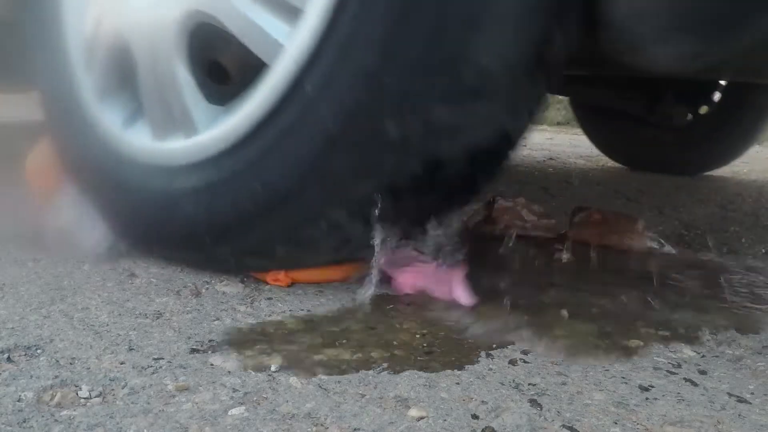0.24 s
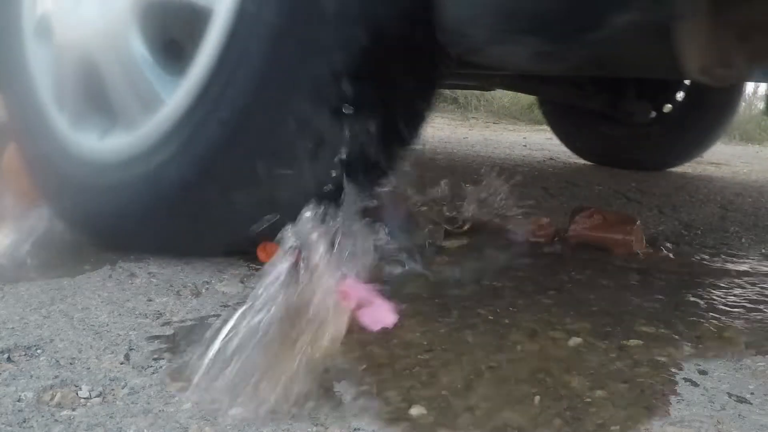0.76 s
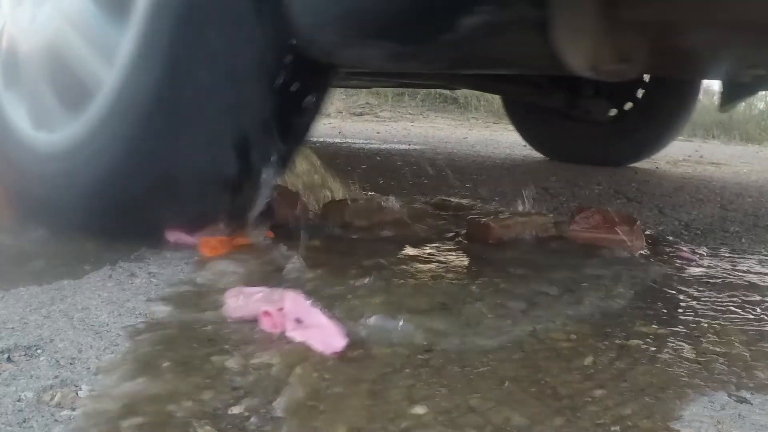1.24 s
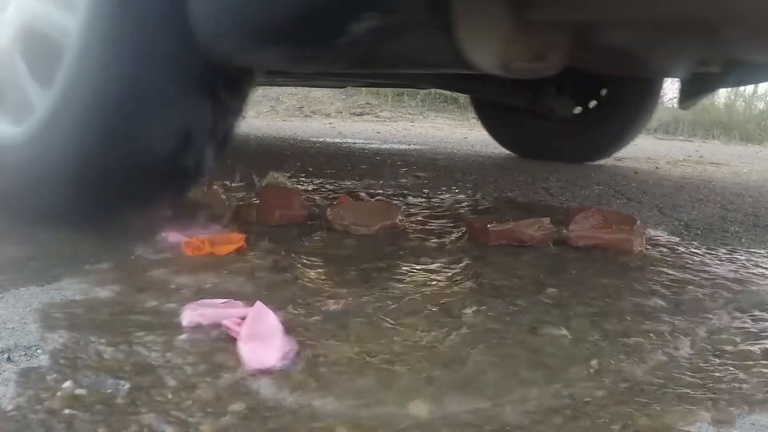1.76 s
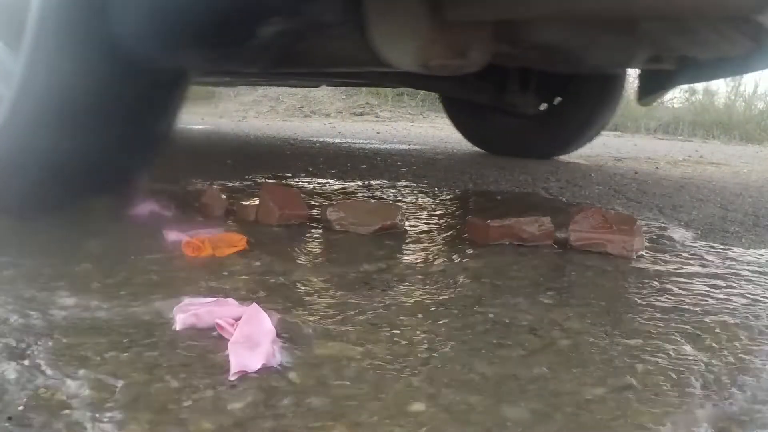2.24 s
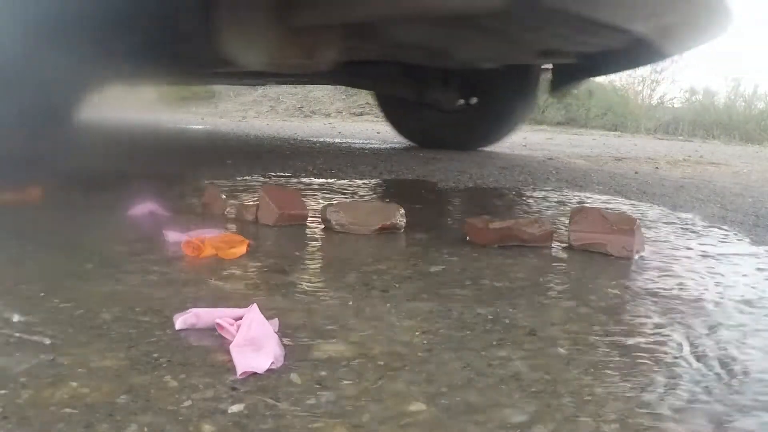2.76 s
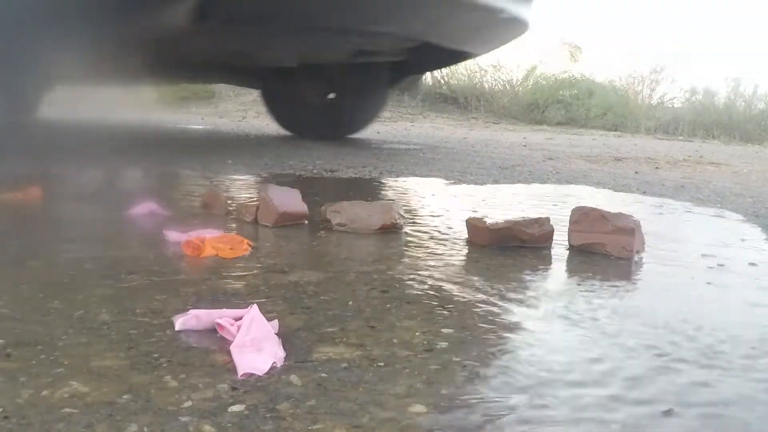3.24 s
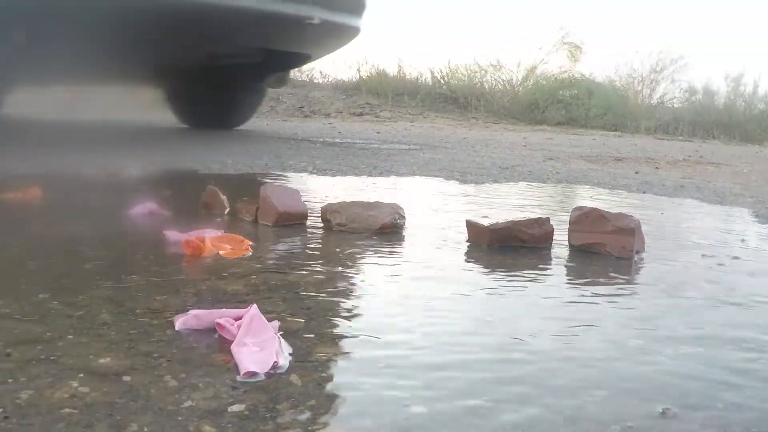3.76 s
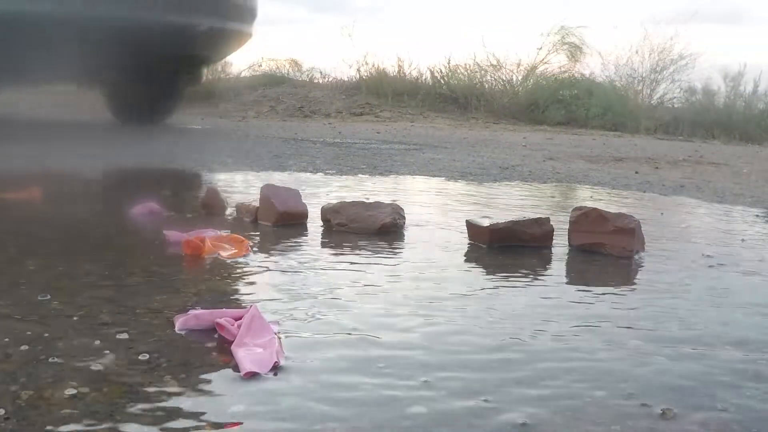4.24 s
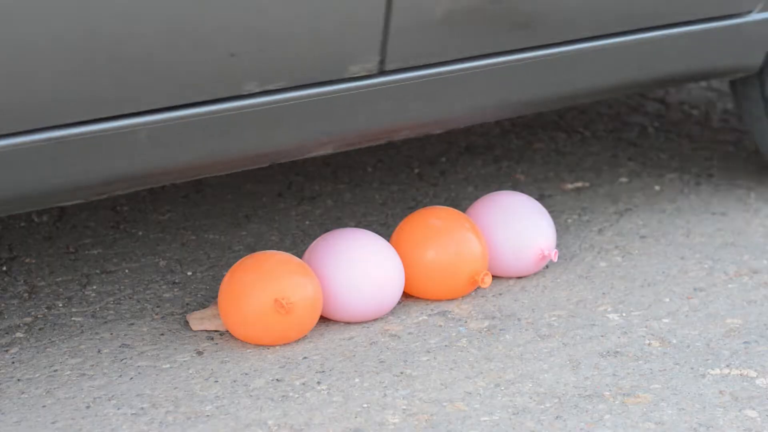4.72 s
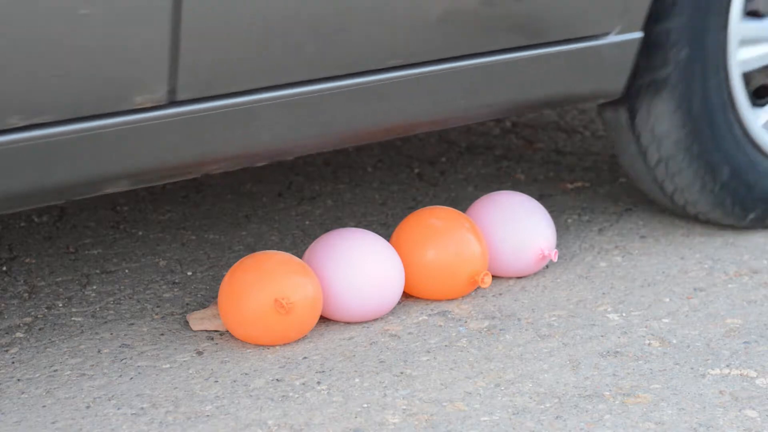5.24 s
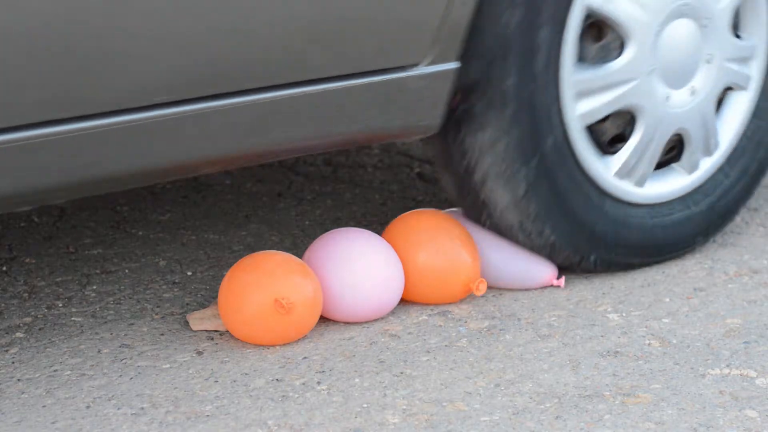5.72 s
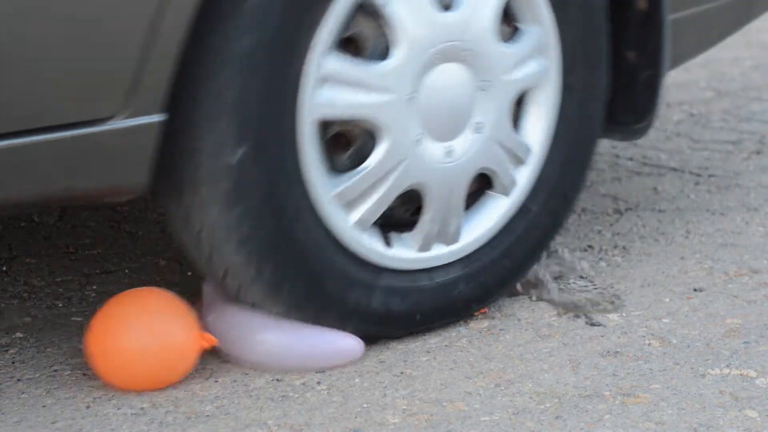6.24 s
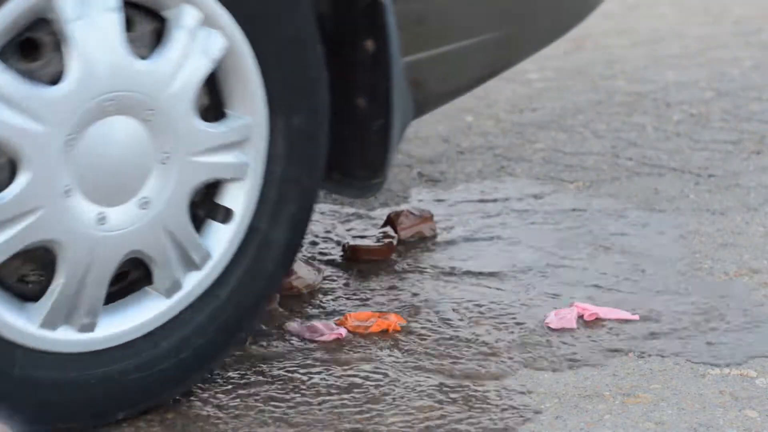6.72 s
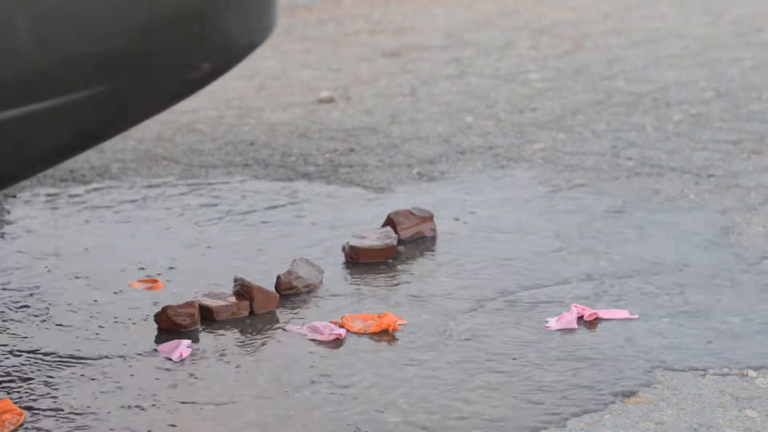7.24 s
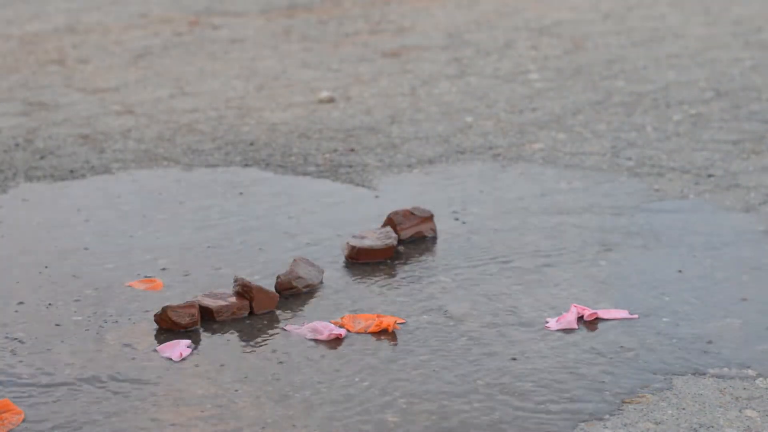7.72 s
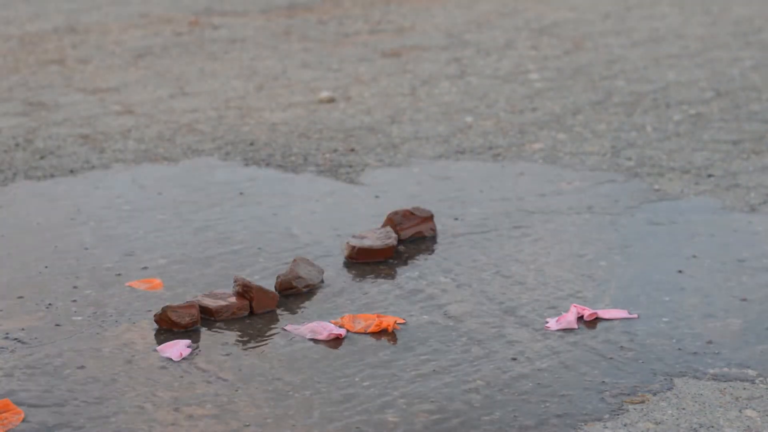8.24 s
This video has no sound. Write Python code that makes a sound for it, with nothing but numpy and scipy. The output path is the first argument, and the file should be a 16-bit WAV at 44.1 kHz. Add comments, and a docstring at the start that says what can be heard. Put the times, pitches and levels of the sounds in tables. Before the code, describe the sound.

Outdoors on a gritty road, slowed and muffled balloon bursts ring under a car as water gushes and gurgles over a low rumble. One loud bang follows, then a quiet stretch of wet tyres rolling away. Suddenly the car is near the microphone, its engine idling with a clatter in a little wind. Water balloons squeak and pop brightly under the tyre, water spatters, and the engine slows.

```python
"""Water balloons burst under the tyre of a creeping car, in three scenes joined by sudden cuts.
First, slowed down and dull: each burst rings the hollow under the car, water sloshes and drips,
and one last bang overloads the sound. Next the car rolls faintly away, cracking small stones.
Last, close up: tight rubber snaps and squeaks and the tyre sprays water, while the engine's
firings make it drone, clatter and hiss and a little wind blows."""
import sys
import numpy as np
from scipy import signal
from scipy.fft import rfft, irfft
from scipy.io import wavfile
from scipy.ndimage import uniform_filter1d

SR = 44100
rng = np.random.default_rng(int(sys.argv[2]) if len(sys.argv) > 2 else 0)


def log_audio(samples):
    """Write samples as a 16-bit WAV file to the path given in sys.argv[1]."""
    # one column per channel
    frames = np.atleast_2d(samples).T
    # limit to full scale, then quantise
    limited = np.clip(frames, -1, 1)
    pcm = np.round(limited * 32767).astype(np.int16)
    wavfile.write(sys.argv[1], SR, pcm)


N = 373527
T = np.arange(N) / SR
CUT_AWAY_S, CUT_CLOSE_S, LEAVES_S = 2.6, 4.5585, 5.9  # two cuts; then the close car starts to leave

# Levels in tables are relative. t60 is the time to fade by 60 dB; a swell's width is half its length.
# gusts of wind: t/s, width/s, level/dB
GUSTS = [(5.288, 0.14, -28), (6.5, 0.21, -32), (6.692, 0.034, -26.5), (8.3, .35, -39)]
# tone of the wind: f/Hz, level/dB
WIND_TONE = [(20, -28), (45, -6.5), (90, -3), (190, -9.5), (400, -14.5), (1200, -72)]

# hum of the far engine: multiple of the firing rate, level/dB
FAR_HUM = [(1, 1), (2, -9.5), (4, -11), (5, -9), (9, -6.5), (10, -13)]
# tone of the far car's rumble and of its tyres: f/Hz, level/dB
FAR_RUMBLE_TONE = [(12, -23), (25, -2), (40, 6.5), (60, -11), (130, -15.5), (300, -24), (400, -17),
                   (520, -29.5), (1000, -41.5)]
FAR_ROAD_TONE = [(300, -7), (700, -11), (1400, -4.5), (1800, -7.5), (2100, -13), (2400, -2.5), (3400, -0.5),
                 (4300, -13), (4900, -10), (5800, -14), (7000, -14), (7800, -29), (10500, -29),
                 (15000, -37)]
# ringing of the far tyres, and a thin whine: f/Hz, width/Hz, level/dB
FAR_ROAD_RINGS = [(1780, 130, 0), (3280, 100, -3.5), (4850, 69, 5)]
FAR_WHINE = [(8500, 200, 0)]
# stones cracking under the far tyres: t/s, level/dB
STONES = [(2.675, -38), (2.7046, -32), (2.7644, -40), (3.5097, -47), (3.5893, -45), (3.8838, -44),
          (3.914, -47.5)]

# engine firings per second, steady and then sagging: t/s, f/Hz
FIRING_RATE = [(4.56, 42.46), (4.65, 42.02), (5.21, 41.5), (5.93, 42.59), (7.49, 41.72), (7.83, 41.2),
               (8.1, 34.03), (8.4, 31.6), (8.47, 32.36)]
# hum of the close exhaust: multiple of the firing rate, level/dB
EXHAUST_HUM = [(1, -2), (2, 5), (2.5, -6), (3, -4), (3.5, -11.5), (4, 3), (5.5, -1), (6, -7), (6.5, -10.5),
               (7, -5.5)]
# engine tones that stand out in turn: multiple of the firing rate, start/s, end/s, level/dB
PASSING_TONES = [(3, 4.56, 5.76, -37), (10, 3.5, 5.95, -32), (9, 5.17, 6.1, -27), (8, 4.8, 7.3, -37.5),
                 (5, 6.6, 7.6, -35.5), (9, 7.1, 7.85, -37), (3, 8.08, 8.06, -31)]
# swells of the engine's drone: t/s, width/s, level/dB
DRONE_SWELLS = [(4.656, .2, -22.5), (5.02, .08, -23.5), (6.15, .2, -24.5), (7.15, 0.35, -27.5),
                (7.807, 0.097, -22), (8.06, 0.068, -25), (8.268, 0.045, -25.5)]
# ringing of the drone, the engine bay and the whistle in the hiss: f/Hz, width/Hz, level/dB
DRONE_RINGS = [(407.8, 18, 0), (433.8, 7.4, 7.5)]
BAY_RINGS = [(1475, 31, -1.5), (862, 8.2, 1), (1137, 14, -3.5), (1890, 15, -12.5), (3330, 83, -4)]
WHISTLE_RINGS = [(9740, 42, 5), (8700, 90, -2), (14630, 60, -2)]
# tone of the valve clatter and of the hiss: f/Hz, level/dB
CLATTER_TONE = [(40, -37), (120, -10.5), (300, -0.5), (500, -7), (590, 1), (660, -3.5), (770, 1),
                (860, -0.5), (950, -4), (1130, 1.5), (1600, -1), (2200, -6), (3300, -8), (5000, -26.5),
                (12000, -54)]
HISS_TONE = [(1200, 1.5), (2500, -6), (3400, 5.5), (4700, 3.5), (7500, 2), (9000, 1.5), (10200, 2),
             (11500, -6), (13000, -13), (15700, -28)]

# grit and drops flicked by the tyre: t/s, level/dB, t60/s, f/Hz
TICKS = [(5.770, -10, 0.029, 2400), (6.917, -14.5, 0.045, 9700), (7.038, -2.5, .012, 9500),
         (8.133, -19.5, 0.12, 6440), (8.326, -10, 0.011, 3760)]
# the slowed tyre squeezes a balloon: t/s, width/s, level/dB
SQUEEZES = [(0.214, 0.074, -32.5), (0.468, 0.055, -32)]
# tone of the slowed tyre rub, car rumble, sloshing and spatter: f/Hz, level/dB
RUB_TONE = [(50, -13.5), (130, 6.5), (260, 1.5), (400, -12), (900, -39.5)]
RUMBLE_TONE = [(6, -1), (12, 13), (20, 7.5), (50, -5), (80, -8), (100, 0), (135, -24), (300, -32.5),
               (900, -60.5)]
SLOSH_TONE = [(88, -53), (150, -29), (324, -8), (437, -2), (467, -6.5), (521, -23.5), (580, -9.5),
              (824, -2.5), (919, -7.5), (1130, -12.5), (1240, -8.5), (1960, -24), (2340, -33.5),
              (3360, -29.5), (3800, -41), (4940, -73), (8360, -120)]
SPATTER_TONE = [(900, -23.5), (1700, 0.5), (2800, -7), (3800, -15.5)]
# water pouring out, then draining: start/s, end/s, slosh/dB, spatter/dB, fall/(dB/s)
GUSHES = [(.16, 0.247, -33.5, -60.5, 69), (.43, 0.518, -26, -37.5, 248), (.56, 0.705, -25.5, -54, 100),
          (0.855, .92, -27, -54, 82), (1.066, 1.237, -30.5, -57.5, 72), (1.475, 1.558, -36, -59.5, 16),
          (2.4, 2.494, -40, -62, 25)]
# slowed ringing of the hollow under the car: f/Hz, width/Hz, level/dB
HOLLOW_RINGS = [(451, 13, 6), (583, 46, -1), (677, 19, 0.5), (822, 24, 4), (905, 44, -9.5), (1230, 130, 0)]
# slowed water slapping the road: t/s, level/dB, air pocket f/Hz, air pocket level/dB
SLAPS = [(.218, -34.5, 234, 7.5), (.370, -32.5, 626, 5), (.434, -19, 1270, -3.5), (.484, -11.5, 821, -0.5),
         (.501, -18.5, 774, 3), (.526, -22.5, 802, -0.5), (.637, -25.5, 1285, -9), (.852, -28, 1225, -4),
         (.878, -24.5, 827, -3), (.904, -25.5, 890, 3), (.989, -32, 840, -11), (1.056, -23.5, 716, -3),
         (1.111, -31.5, 830, -3), (1.205, -28.5, 412, -6), (1.406, -33, 808, -6), (1.509, -32, 630, -4),
         (1.641, -44, 780, 8), (1.818, -34.5, 690, -12), (2.02, -43, 806, 5), (2.343, -16, 457, 3.5)]

# stretched rubber squeaking on the tyre: t/s, level/dB, width/s, f/Hz
SQUEAKS = [(5.802, -28.5, 0.012, 8950), (5.827, -29, 0.013, 8900), (5.872, -33, .008, 9000),
           (6.243, -28, .012, 8350), (6.468, -25, 0.025, 1506)]
# close balloons tearing: t/s, level/dB, t60/s, f/Hz
SNAPS = [(6.1244, -11, 0.072, 7900), (6.3039, 1, 0.013, 9900), (6.311, -17.5, 0.11, 8000),
         (6.324, -13.5, 0.065, 8500), (6.406, -20, 0.042, 9200), (6.651, -17.5, 0.017, 5470),
         (6.783, -4, 0.032, 9540)]
# tone of the close snaps and spray: f/Hz, level/dB
SNAP_TONE = [(300, -23), (650, 0), (1050, 1.5), (3000, 2), (7000, 0), (9700, 8), (12000, -4),
             (16000, -15.5)]
# slowed balloons bursting: t/s, level/dB, t60/s, crack level/dB, air pocket f/Hz
SLOW_BURSTS = [(0.408, -20, .4, 5.5, 797), (0.479, -15.5, .14, -1.5, 854), (0.813, -19, 0.063, -2, 702),
               (1.164, -16, 0.031, -18, 1040), (2.329, 6, .015, -13, 952), (2.333, -7.5, 0.15, -16.5, 720)]
# tone of a slowed burst's rush of water and of its crack: f/Hz, level/dB
RUSH_TONE = [(110, -51), (180, -20), (320, -12.5), (440, -3), (515, -19.5), (580, -6.5), (800, -4.5),
             (950, -6), (1120, -14), (1250, -9.5), (1450, -16), (2100, -28.5), (2750, -28.5), (3800, -33.5)]
CRACK_TONE = [(400, -20), (900, 0.5), (1600, 10), (2150, 2.5), (2750, 5), (3050, -2.5), (3800, -8)]


def amp(db):
    """Turn decibels into a gain, the number a sound is multiplied by."""
    return 10 ** (np.asarray(db) / 20)


def unit(x):
    """Scale a sound to an average power of 1."""
    return x / np.sqrt(np.mean(x ** 2))


def noise():
    """White noise: an even hiss."""
    return rng.standard_normal(N)


def wander(rate):
    """A random drift of about 1 either way that changes course `rate` times a second."""
    points = rng.standard_normal(4096)
    return 1.2 * np.interp(T * rate, np.arange(len(points)), points)


def after(s):
    """Seconds gone by since a moment; zero before it."""
    return np.maximum(T - s, 0)


def swell(s, width, db):
    """A gain that rises and falls smoothly around one moment."""
    return amp(db) * np.exp(-((T - s) / width) ** 2)


def held(start, end, db, rise, fall):
    """A gain that climbs, holds and falls; rise and fall are in dB per second."""
    return amp(db - rise * np.maximum(start - T, 0) - fall * after(end))


def fading(db, fall, since=0):
    """A gain that holds until `since`, then loses `fall` dB per second."""
    return amp(db - fall * after(since))


def together(*gains):
    """The joint gain of unrelated sounds: their powers add."""
    return np.sqrt(sum(g ** 2 for g in gains))


def colour(x, tone):
    """Give a sound the tone in a table; white noise keeps its power."""
    hz, db = np.transpose(tone)
    size = 16384
    bins_hz = np.arange(size // 2 + 1) * SR / size
    gain = amp(np.interp(np.log(bins_hz + 1), np.log(hz), db))
    # build the filter so that nothing sounds before the hit that causes it
    cepstrum = irfft(np.log(gain))[:size // 2]
    response = irfft(np.exp(rfft(2 * cepstrum, size)))
    return signal.oaconvolve(x, response / np.linalg.norm(response))[:N]


def ring(x, rings):
    """Let a sound ring at a few pitches; a narrower width rings longer."""
    x = x + 1e-18  # a tiny offset keeps the filters fast in silence
    return sum(amp(db) * signal.lfilter(*signal.iirpeak(hz, hz / width, fs=SR), x)
               for hz, width, db in rings)


def whine(rings):
    """Noise narrowed twice, until it is almost a note."""
    return unit(ring(ring(noise(), rings), rings))


def lowpass(x, hz):
    """Cut away the treble above a frequency."""
    return signal.sosfilt(signal.ellip(8, .2, 80, hz, fs=SR, output="sos"), x)


def clicks(rate, spread_db):
    """Random clicks, about `rate` a second, most small and a few large."""
    hits = (rng.random(N) < rate / SR) * rng.choice([-1, 1], N)
    return unit(hits * amp(spread_db * np.minimum(rng.exponential(size=N), 4)))


def decay(start, t60):
    """The samples and the shape of a sudden sound dying away for a third of a second."""
    first = int(start * SR)
    span = np.arange(first, min(first + SR // 3, N))
    return span, amp(-60 * (span - first) / SR / t60)


def puff(start, t60):
    """A puff of noise that dies away."""
    span, shape = decay(start, t60)
    out = np.zeros(N)
    out[span] = shape * rng.choice([-1, 1], len(span))
    return out


def hum(firings, tones, waver_db):
    """Tones at multiples of the firing rate; `firings` counts the engine's firings so far."""
    return unit(sum(amp(db + waver_db * wander(9)) * np.sin(2 * np.pi * (k * firings + rng.random()))
                    for k, db in tones))


def wind():
    """Low gusts buffet the microphone over a light breeze."""
    breeze = amp(-41.5)
    return together(breeze, *(swell(*row) for row in GUSTS)) * colour(noise(), WIND_TONE)


def far_car(firings):
    """Wet tyres sizzle and crack small stones over a faint hum, whine and rumble."""
    stones = sum(amp(db - 6.5) * puff(s, t60=.033) for s, db in STONES)
    wet_grit = swell(2.675, width=.049, db=-52)
    rolling = together(fading(-59, fall=4.5, since=CUT_AWAY_S), wet_grit)
    sizzle = rolling * (noise() + amp(-8.5) * clicks(rate=200, spread_db=6))
    road = colour(sizzle + stones, FAR_ROAD_TONE)
    road = amp(1.5) * road + amp(4.5) * ring(road, FAR_ROAD_RINGS)
    thin_whine = amp(-82) * whine(FAR_WHINE)
    idle_gain = fading(-52, fall=5, since=CUT_AWAY_S) * fading(0, fall=26, since=3.53)
    idle = idle_gain * hum(firings, FAR_HUM, waver_db=1)
    rumble = fading(-53.5, fall=.93, since=CUT_AWAY_S) * colour(noise(), FAR_RUMBLE_TONE)
    return road + thin_whine + idle + rumble


def engine_drone(kicks, gas):
    """Each firing kicks a hollow space and blows gas through it, so it drones."""
    drive = unit(kicks) + .8 * unit(gas * noise())
    drone = ring(ring(drive, DRONE_RINGS), [(430, 90, 0)])  # the second ring trims lows and highs
    power = uniform_filter1d(drone ** 2, int(.09 * SR))
    return drone / np.sqrt(power + 1e-12)  # even out slow swells, keep the quick flutter


def passing_tones(firings):
    """Single engine tones stand out in turn as the car passes."""
    tones = 0
    for multiple, start, end, db in PASSING_TONES:
        tone = hum(firings + .008 * wander(30), [(multiple, 0)], waver_db=2.5)
        tones += held(start, end, db - 1, rise=34, fall=34) * tone
    return tones


def valve_clatter(pulses):
    """Valves rattle and ring the engine bay, open at first and then screened by the car."""
    clatter = colour(pulses * noise(), CLATTER_TONE)
    bay_gain = amp(-5) + fading(8, fall=15, since=5.1)
    return unit(clatter + bay_gain * ring(clatter, BAY_RINGS))


def engine_hiss(pulses):
    """A fluttering hiss with a high whistle pulses along with the valves."""
    flutter = amp(.7 * wander(30))
    hiss = colour(unit(.17 + pulses) * flutter * noise(), HISS_TONE)
    return unit(hiss + ring(hiss, WHISTLE_RINGS))


def close_engine(firings, firing_hz):
    """Uneven firings drive the engine's sounds, which fade as it slows and as the car leaves."""
    uneven = firings + .012 * wander(70)
    count = uneven.astype(int)
    strength = amp(3 * rng.standard_normal(1024))[count]
    kicks = strength * np.diff(count, prepend=0)
    gas = strength * np.exp(-(uneven % 1) / .64)
    pulses = unit(1 + np.exp(-(2 * firings % 1) / 2.2) + 1.2 * gas)  # valves hit twice a firing
    octaves = np.log2(firing_hz / 42)  # speed compared with a 42 Hz idle

    def gain(db, db_per_octave, fall):
        return fading(db + db_per_octave * octaves, fall, since=LEAVES_S)

    swells = [swell(*row) for row in DRONE_SWELLS]
    drone = together(gain(-26, db_per_octave=16, fall=.74), *swells) * engine_drone(kicks, gas)
    tones = passing_tones(firings)
    clatter = gain(-26, db_per_octave=10.5, fall=.41) * valve_clatter(pulses)
    hiss = gain(-28.5, db_per_octave=15, fall=2.57) * engine_hiss(pulses)
    exhaust = gain(-31.5, db_per_octave=4.9, fall=1.2) * hum(firings, EXHAUST_HUM, waver_db=0)
    return exhaust + tones + drone + clatter + hiss


def splats(rate, spread_db, decay_s):
    """Drops land at random, each a very short puff of noise."""
    power = signal.lfilter([1], [1, -np.exp(-1 / (decay_s * SR))], clicks(rate, spread_db) ** 2 + 1e-18)
    return unit(np.sqrt(power) * noise())


def close_tyre():
    """Grit patters, spray builds as the balloons go, and the tyre flicks a few larger bits."""
    patter = clicks(rate=1400, spread_db=3.5) + amp(-7) * noise()
    patter += amp(3) * splats(rate=45, spread_db=.5, decay_s=.0047)
    spray = held(6.2, 6.86, db=-35.5, rise=28, fall=8.5) * amp(1.9 * wander(14))
    grit = fading(-41.5, fall=15, since=LEAVES_S)
    ticks = sum(ring(puff(s, t60), [(hz, 1400, db)]) for s, db, t60, hz in TICKS)
    return colour(together(spray, grit) * patter, SNAP_TONE) + ticks


def slowed_tyre():
    """The tyre rubs, harder when it squeezes a balloon, over the deep rumble of the car."""
    pressure = together(fading(-37.5, fall=10), *(swell(*row) for row in SQUEEZES))
    rub = amp(-3.5) * pressure * colour(noise(), RUB_TONE)
    return rub + fading(-31.5, fall=4) * colour(noise(), RUMBLE_TONE)


def plop(start, t60, hz):
    """A pocket of air rings and rises slightly in pitch as it fades."""
    span, shape = decay(start, t60)
    pitch_hz = hz * (1.03 - .066 * shape)
    out = np.zeros(N)
    out[span] = 2.23 * (shape - shape ** 10) * np.sin(2 * np.pi * np.cumsum(pitch_hz) / SR)
    return out


def bubbles(per_second=28, middle_hz=717, spread_octaves=.4):
    """Pockets of air gurgle at random through the slowed scene."""
    gurgle = 0
    for when, pitch, softness in rng.random((int(per_second * CUT_AWAY_S), 3)):
        hz = middle_hz * 2 ** (spread_octaves * (2 * pitch - 1))
        gurgle += amp(.5 - 7.3 * softness) * plop(when * CUT_AWAY_S, t60=.06, hz=hz)
    return gurgle


def slowed_water():
    """Each gush sloshes under the car and throws drops; the puddle laps and drips in between."""
    flow = fading(-34, fall=5)  # lapping
    drops = fading(-58, fall=3.2)  # dripping
    for start, end, slosh_db, spatter_db, fall in GUSHES:
        flow = together(flow, held(start, end, slosh_db, rise=259, fall=fall))
        drops = together(drops, held(start, end, spatter_db, rise=259, fall=fall))
    slosh = colour(clicks(rate=220, spread_db=1.5) + amp(2) * noise(), SLOSH_TONE)
    slosh = amp(-4.5) * unit(slosh + amp(-.5) * ring(slosh, HOLLOW_RINGS))
    gurgle = bubbles()
    spatter = colour(clicks(rate=210, spread_db=2.6) + amp(3) * noise(), SPATTER_TONE)
    return flow * (slosh + gurgle) + drops * spatter


def rubber_squeaks():
    """Balloon skin gives short, grainy squeaks as the tyre pinches it."""
    return sum(swell(s, width, db) * whine([(hz, 600, 0)]) for s, db, width, hz in SQUEAKS)


def close_balloons():
    """Tight rubber tears with a bright snap."""
    snaps = 0
    for s, db, t60, hz in SNAPS:
        tear = amp(db) * puff(s, t60)
        snaps += amp(7.5) * tear + amp(-2.5) * ring(tear, [(hz, 2500, 0)])
    return colour(snaps, SNAP_TONE)


def slowed_balloons(burst_pocket_db=-2.5, slap_t60=.1, slap_crack_db=-14.5):
    """Each burst or slap is a crack, a plop of air and a rush of water ringing under the car."""
    hits = [(*row, burst_pocket_db) for row in SLOW_BURSTS]
    hits += [(s, db, slap_t60, slap_crack_db, hz, pocket_db) for s, db, hz, pocket_db in SLAPS]
    rush = cracks = pockets = 0
    for s, db, t60, crack_db, hz, pocket_db in hits:
        rush += amp(db) * (puff(s, t60) + amp(-38) * puff(s, t60=.85))  # with a faint tail
        cracks += amp(db + crack_db) * puff(s, t60=.045)
        pockets += amp(db + pocket_db) * plop(s, t60, hz)
    rush = colour(rush, RUSH_TONE)
    rush = amp(-2) * rush + amp(1) * ring(rush, HOLLOW_RINGS)
    return rush + pockets + colour(cracks, CRACK_TONE)


def scene():
    """The slowed, far and close scenes follow one another with sudden cuts."""
    firing_hz = np.interp(T, *np.transpose(FIRING_RATE))
    firings = np.cumsum(firing_hz) / SR
    slowed = lowpass(slowed_balloons() + slowed_water() + slowed_tyre(), hz=3720)
    close = close_engine(firings, firing_hz) + close_balloons() + close_tyre() + rubber_squeaks() + wind()
    return np.select([T < CUT_AWAY_S, T < CUT_CLOSE_S], [slowed, far_car(firings)], close)[None]


def record(dry):
    """The loudest peaks are flattened, and the level dips for a moment after each overload."""
    memory = np.exp(-1 / (.066 * SR))  # the dip eases off over about 66 ms
    excess = np.maximum(np.abs(dry) - .7, 0)
    overload = signal.lfilter([1 - memory], [1, -memory], excess)
    return lowpass(np.clip(dry / (1 + 6 * overload), -1, 1), hz=15750)


dry = scene()
out = record(dry)
log_audio(out)
```